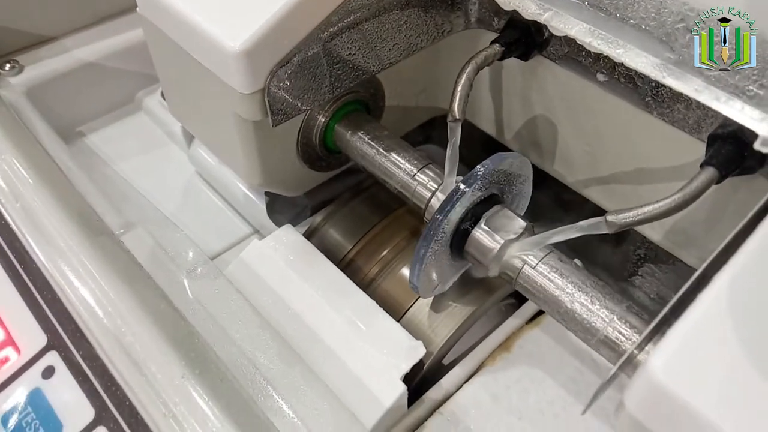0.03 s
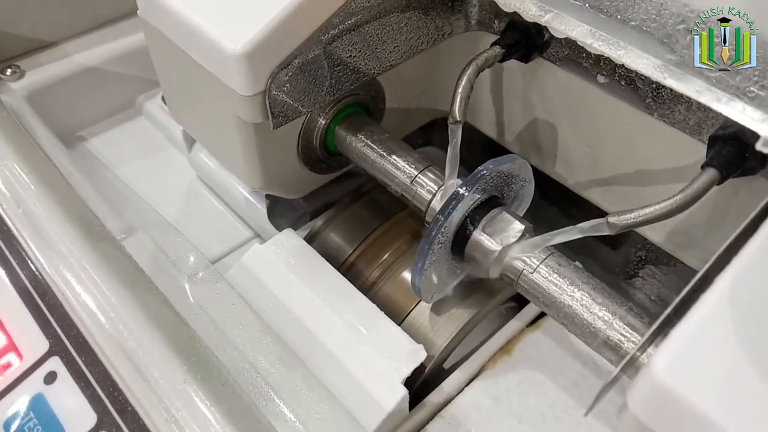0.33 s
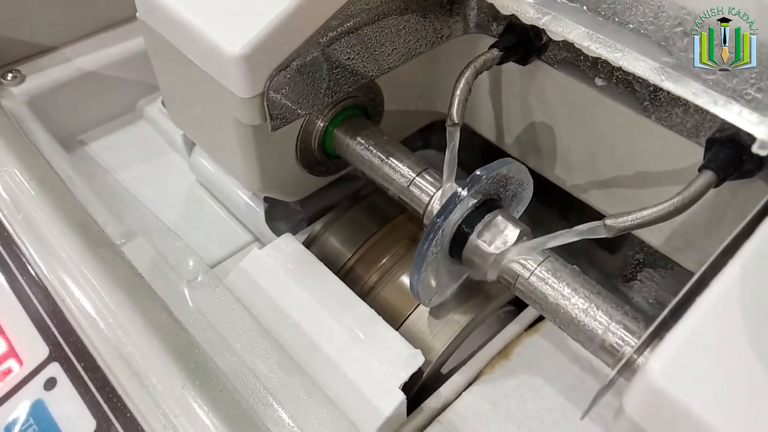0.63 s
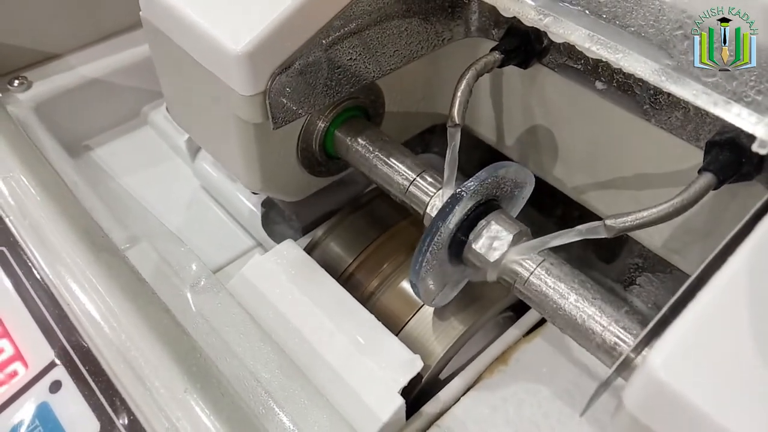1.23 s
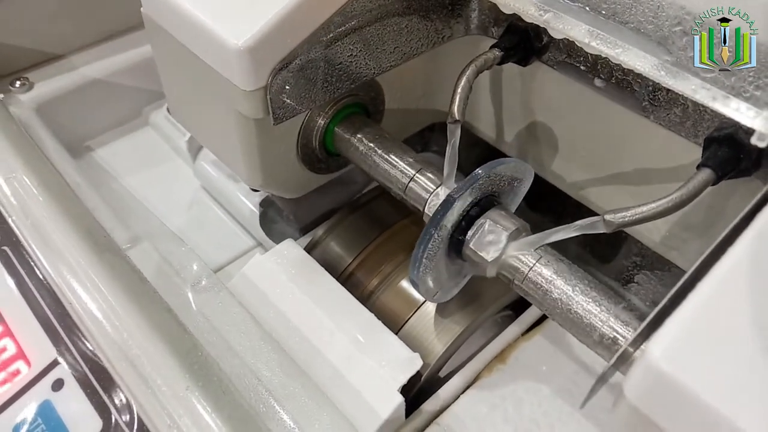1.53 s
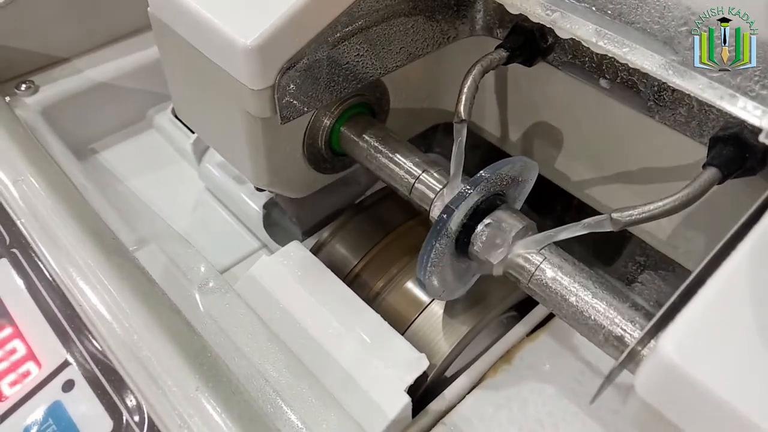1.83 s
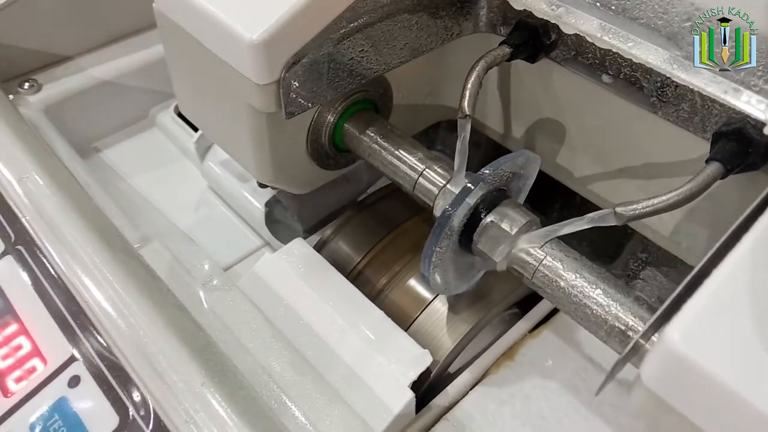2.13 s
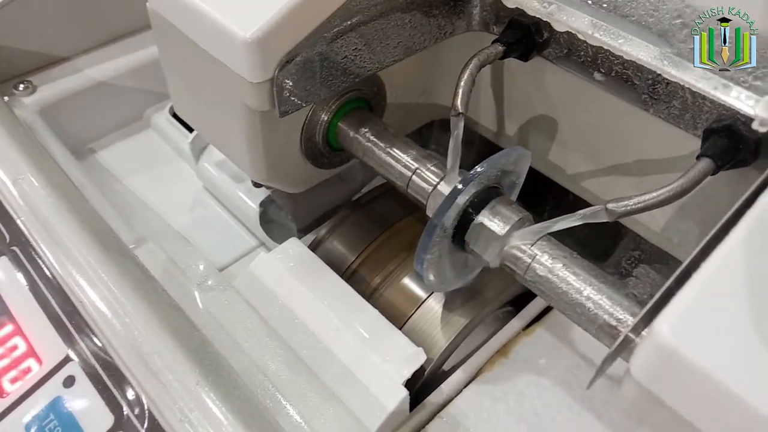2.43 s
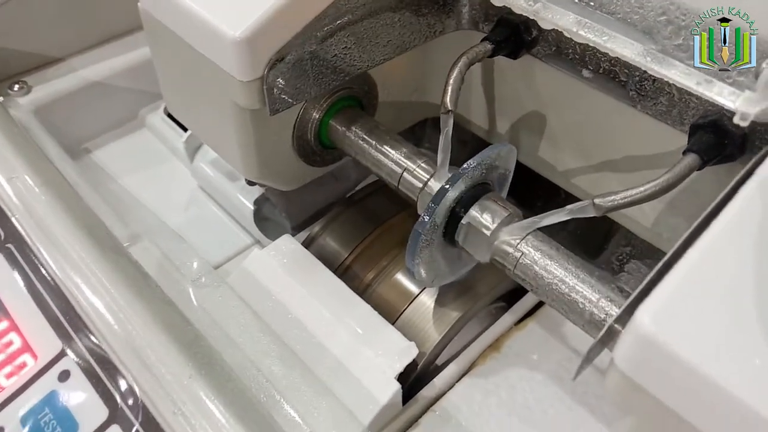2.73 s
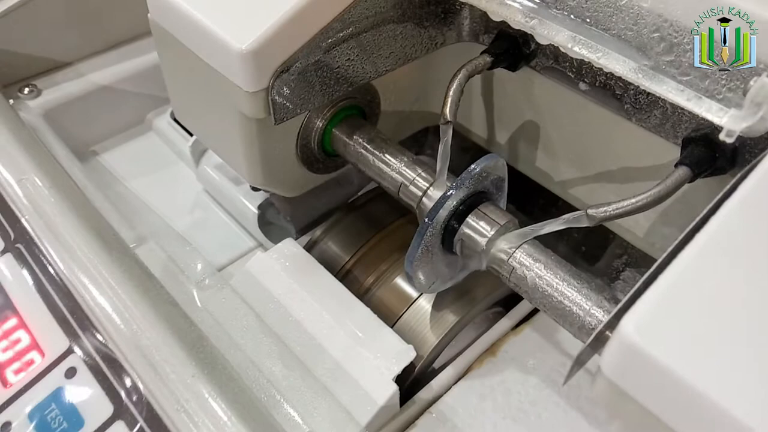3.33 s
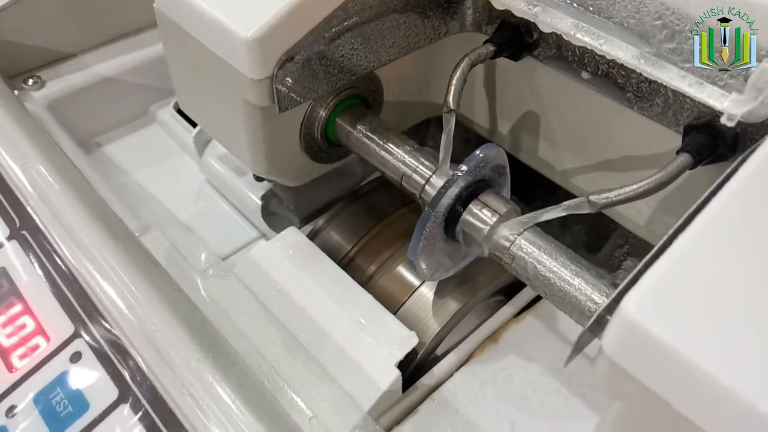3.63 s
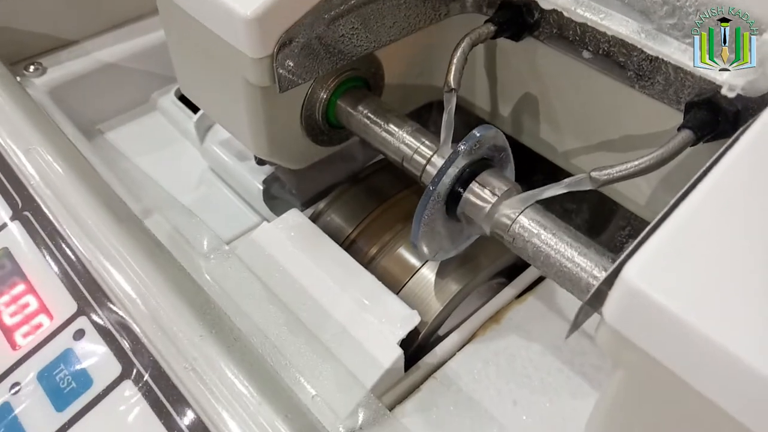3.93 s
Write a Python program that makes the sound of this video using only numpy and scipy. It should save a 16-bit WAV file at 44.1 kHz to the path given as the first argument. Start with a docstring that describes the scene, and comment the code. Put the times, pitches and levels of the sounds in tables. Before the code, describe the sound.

A lens edger grinds a lens with a continuous rasping buzz, heard close up for four seconds. The cut is heaviest in the first 0.6 seconds, shuddering the housing, lightens to its gentlest around 1.7 seconds, then firms again from about 2.8 seconds. High ringing notes swell and fade throughout. Underneath, a low motor hum throbs quickly, rising slightly by one second, and cooling water hisses evenly.

```python
"""A rasping buzz comes first: a lens edger is grinding the rim of a spectacle lens on a wet wheel.
The wheel spins about fifty times a second, and the same grit passes under the lens on every turn.
The cut is heavy at first, then lightens, and different ringing notes swell as the lens slowly turns.
Underneath, two motor hums throb against each other and cooling water hisses."""
import sys
import numpy as np
from scipy import signal
from scipy.fft import rfft, irfft
from scipy.io import wavfile

SR = 44100
rng = np.random.default_rng(int(sys.argv[2]) if len(sys.argv) > 2 else 0)


def master(y):
    """Save y as 16-bit WAV."""
    cut = np.clip(np.atleast_2d(y).T, -1, 1)
    pcm = np.round(cut * 32767)  # scale
    wavfile.write(sys.argv[1], SR, pcm.astype(np.int16))


N = 176400
T = np.arange(N) / SR
BINS_HZ = np.arange(N // 2 + 1) * SR / N


def from_db(db):
    """Turn decibels into a factor to multiply by."""
    return 10 ** (np.asarray(db) / 20)


def unit_power(x):
    """Scale a sound to an average power of one."""
    return x / np.sqrt(np.mean(x ** 2) + 1e-20)


def in_time(rows):
    """Join (time, value) points with straight lines."""
    return np.interp(T, *np.transpose(rows))


def colour(x, points):
    """Turn the lows and highs of a sound up or down; unit power."""
    hz, db = np.transpose(points)
    gain = from_db(np.interp(np.log(np.maximum(BINS_HZ, 1)), np.log(hz), db))
    return unit_power(irfft(rfft(x) * gain, N))


def drift(hz):
    """A random wobble, mostly slower than hz; unit power."""
    return unit_power(irfft(rfft(rng.standard_normal(N)) / (1 + (BINS_HZ / hz) ** 2), N))


def wavering_tone(cycles, depth=0.22):
    """A pure tone whose level and phase wander a little."""
    waver = 1 + depth * (drift(hz=10.7) + 1j * drift(hz=3.6))
    return unit_power(np.real(waver * np.exp(2j * np.pi * cycles)))


# Tone colour of the drive and the water: f/Hz, level/dB
WASH_COLOUR = [(25, -19), (50, -19), (90, 10), (150, -1.5), (205, 1), (235, -8), (275, -7), (380, -1.5),
               (465, -7.5), (510, -0.5), (670, -11), (810, 0.5), (920, -2), (1200, -3.5), (2000, -10.5),
               (2800, -11), (3250, -8.5), (4000, -8.5), (6000, -10.5), (8500, -16), (15500, -21.5)]
def drive_and_water():
    """The drive rumbles and the cooling water hisses evenly."""
    return from_db(-33.5) * colour(rng.standard_normal(N), WASH_COLOUR)


# The two strong motor hums: f/Hz, base level/dB
MOTOR_HUMS = [(99.617, -21.5), (110.705, -33)]
# How both hums rise and fall: t/s, added level/dB
HUM_SWELL = [(0, -4), (.5, -3), (.9, 0), (1.4, -0.1), (2.8, -1.1), (4, -1)]
# Extra rise of the second hum: t/s, added level/dB
SECOND_HUM_SWELL = [(.6, -3), (.8, 0)]
# Faint motor tones: f/Hz, level/dB
FAINT_TONES = [(121.9, -42.5), (257.5, -53.5), (298.85, -46), (398.4, -46.5), (498.1, -57), (697.3, -57.5)]
def motors(in_step_s=0.02347):
    """Two hums fall in and out of step eleven times a second; fainter tones waver above them."""
    first, second = (from_db(db) * np.sqrt(2) * np.cos(2 * np.pi * hz * (T - in_step_s))
                     for hz, db in MOTOR_HUMS)
    hums = first + second * from_db(in_time(SECOND_HUM_SWELL))
    tones = sum(from_db(db) * wavering_tone(hz * T + rng.random()) for hz, db in FAINT_TONES)
    return hums * from_db(in_time(HUM_SWELL)) + tones


# Tones of the shaft: cycles per turn, base level/dB, dB gained per dB of pressure
SHAFT_TONES = [(3, -39, 0), (7, -48, 0.78), (8, -46.5, 1.52), (9, -53.5, 1.9), (11, -54, 2.5), (10, -51, 0),
               (13, -40, 1.2), (16, -42, 1.06), (20, -51, 0.8), (21, -42, 1.6), (23, -46.5, 0.4)]
def shaft_chatter(turns, pressure_db):
    """The shaft shakes in step with the wheel; most of its tones grow under pressure."""
    return sum(from_db(db + follows * pressure_db) * wavering_tone(multiple * turns + rng.random())
               for multiple, db, follows in SHAFT_TONES)


# High spots round the wheel: place/turns, width/turns, strength/dB
WHEEL_BUMPS = [(0.034, 0.063, 0), (0.21, 0.022, -1.5), (0.365, 0.031, -3.5), (.68, 0.096, -20.5)]
def bite(turns):
    """The wheel bites harder where it stands high."""
    return 1 + sum(from_db(db) * np.exp(-.5 * (((turns - place + .5) % 1 - .5) / width) ** 2)
                   for place, width, db in WHEEL_BUMPS)


def wheel_surface(turns, spread_db, size=4096, steps=10, overtones=330, kept=0.934):
    """The same grit comes round every turn, slowly changing as the lens moves across it."""
    angle = np.arange(size) / size
    state, out = rng.standard_normal((2, size)), 0
    for step in range(steps):
        # Most of the surface survives each step of wear.
        state = kept * state + np.sqrt(1 - kept ** 2) * rng.standard_normal((2, size))
        grit, unevenness = state
        # Even out the overtones while keeping the grit bunched at the high spots.
        spectrum = rfft(grit * bite(angle))[:overtones]
        evened = irfft(spectrum / abs(spectrum), size)
        spectrum = rfft(evened * np.sqrt(bite(angle)))[:overtones]
        strength = from_db(spread_db * np.minimum(unevenness[:overtones], 2))  # some stand out
        surface = unit_power(irfft(strength * spectrum / abs(spectrum), size))
        fade = np.maximum(1 - abs(T / T[-1] * (steps - 1) - step), 0)
        out = out + fade * np.interp(turns % 1, angle, surface)
    return unit_power(out)


def knocks(turns, place_turns=.93, spread_db=2):
    """The edge of the first high spot knocks the lens once a turn, never equally hard."""
    samples_away = ((turns - place_turns + .5) % 1 - .5) / np.gradient(turns)
    return unit_power(np.sinc(samples_away) * from_db(spread_db * drift(hz=36)))


# Tone colour of the shaking housing: f/Hz, level/dB
HOUSING_COLOUR = [(230, -40), (370, 8.5), (500, 7), (650, 8.5), (780, 9), (950, 6), (1120, 7), (1300, -26),
                  (3000, -28)]
def housing_shudder(push, chips, pressure_db):
    """Grit and chips shake the housing, far more under load."""
    return colour(push + 0.31 * chips, HOUSING_COLOUR) * from_db(-45 + 1.8 * pressure_db)


# Ringing notes of lens and clamp: f/Hz, width/Hz, peak level/dB, loudest at t/s, swell width/s
LENS_NOTES = [ (390, 53, -38.5, 0.85, 0.16), (1010, 470, -34.5, 2.5, .03), (1226, 660, -39, 3.5, 0.67),
              (1711, 24, -37.5, 0.4, 0.3), (1769, 45, -44, 1.09, 0.45), (1862, 47, -43, 3.4, .9),
              (2195, 77, -42, 3.64, 0.94), (2394, 160, -38.5, 0.58, 0.68), (2450, 280, -38.5, 3.48, 0.78),
              (2868, 54, -44, 0.64, 0.51), (2890, 82, -42.5, 3.5, .7), (3016, 52, -38.5, 2.65, 0.43),
              (3830, 114, -34.5, 0.046, 0.27), (3820, 150, -35.5, 0.9, 0.3), (3777, 41, -37, 1.95, 0.93),
              (3866, 122, -37, 2.34, .8), (4295, 48, -38, 0.16, 0.4), (4320, 110, -42, 2.7, 1.4),
              (5210, 140, -41, 0.18, 0.79), (5183, 140, -43, 3.4, 1.1), (5880, 95, -36, 0.47, 0.42),
              (6044, 360, -33.5, 1.85, 0.74), (6520, 580, -31, 0.034, 0.4), (6610, 220, -33.5, 3.6, 0.53),
              (8000, 1800, -36, 0.045, 0.18), (7800, 200, -44, 3.9, 0.5), (8950, 50, -46, 3.33, 1.4),
              (9190, 94, -46.5, 1.4, 1.15), (10440, 170, -39, .44, 0.65), (10400, 270, -40, 3.3, 0.64),
              (12650, 140, -47, 2.1, .6), (13900, 320, -47, 3.3, .6)]
def lens_ringing(turns, push, flow, knock_share=0.43):
    """Rubbing and knocks ring the lens and clamp; each note is loudest at one place on the rim."""
    chip_noise = 0.38 * rng.standard_normal(N)
    rub = unit_power(flow * (push + chip_noise) * bite(turns) ** 0.39)  # pulses at the high spots
    shaking = knock_share * knocks(turns) + (1 - knock_share) * rub
    out = 0
    for hz, width_hz, db, peak_s, swell_s in LENS_NOTES:
        band = signal.butter(2, [hz - width_hz / 2, hz + width_hz / 2], "band", fs=SR, output="sos")
        swell = np.exp(-.5 * ((T - peak_s) / swell_s) ** 2)
        out += unit_power(signal.sosfilt(band, shaking)) * from_db(db) * swell
    return out


# Tone colour of the chips: f/Hz, level/dB
CHIP_COLOUR = [(150, -2.5), (400, -1.5), (1100, -4), (2000, -2.5), (2900, -6), (3200, -10.5), (3500, -7.5),
               (4000, -1.5), (5500, -0.5), (6400, 6.5), (7000, 1), (8100, -8.5), (8700, -8.5), (9900, -3),
               (11800, -9.5), (13700, -10), (14600, -16)]
def chip_hiss(chips, pressure_db):
    """Tiny chips break away at random and make a hiss."""
    return colour(chips, CHIP_COLOUR) * from_db(-32.5 + 0.089 * pressure_db)


# Tone colour of the rasp: f/Hz, level/dB
RASP_COLOUR = [(150, -21), (300, 1.5), (650, -5.5), (1100, -12), (1450, 4.5), (1950, -6), (2400, -2),
               (3000, -4.5), (3200, -4), (3450, -7.5), (3900, 0), (5500, -2.5), (6400, 1), (7100, -3),
               (8100, -9.5), (8700, -9), (9900, -8), (11300, -12), (13700, -8.5), (14600, -15)]
def grit_rasp(grit, pressure_db):
    """The scrape repeats with every turn, so it buzzes."""
    return colour(grit, RASP_COLOUR) * from_db(-32 + 0.049 * pressure_db)


def grinding(turns, pressure_db):
    """The wheel scrapes chips off the lens and shakes the lens, its clamp and the housing."""
    grit = wheel_surface(turns, spread_db=5)
    flow = from_db(1.07 * drift(hz=36) + 0.15 * drift(hz=9.8))  # no two turns shed the same amount
    chips = rng.standard_normal(N) * bite(turns) * flow
    chips = unit_power(chips * from_db(2 * drift(hz=660)))  # grains differ in size
    push = wheel_surface(turns, spread_db=2)  # the grit's force on lens and housing
    return (housing_shudder(push, chips, pressure_db) + lens_ringing(turns, push, flow)
            + chip_hiss(chips, pressure_db) + grit_rasp(grit * flow, pressure_db))


# Wheel speed, dragged down at first by the heavy cut: t/s, speed/(turns per s)
WHEEL_SPEED = [(0, 49.9), (.25, 50.02), (.5, 50.09), (.85, 50.3), (4, 50.305)]
# How hard the lens presses on the wheel: t/s, level/dB
LENS_PRESSURE = [(0, 3.5), (.3, 5.5), (.6, 4), (.9, 0.5), (1.2, -4), (1.7, -7), (2.3, -4.5), (2.8, -0.5),
                 (3.4, 0.5), (4, 0)]
def scene():
    """The machine heard from just above its open chamber."""
    turns = np.cumsum(in_time(WHEEL_SPEED)) / SR
    pressure_db = in_time(LENS_PRESSURE)
    mix = grinding(turns, pressure_db) + shaft_chatter(turns, pressure_db) + motors() + drive_and_water()
    return mix[None]


def record(dry, cutoff_hz=15750):
    """The very highest treble is cut off steeply."""
    return signal.sosfilt(signal.ellip(12, .1, 90, cutoff_hz, fs=SR, output="sos"), dry)


dry = scene()
out = record(dry)
master(out)
```